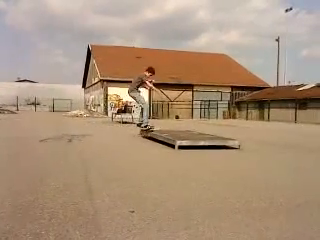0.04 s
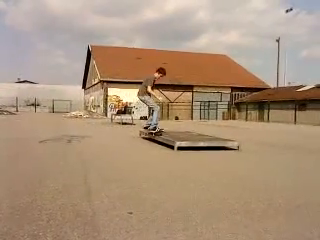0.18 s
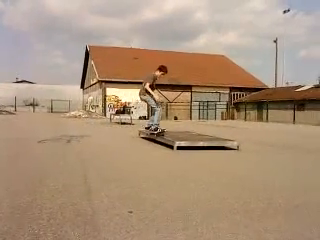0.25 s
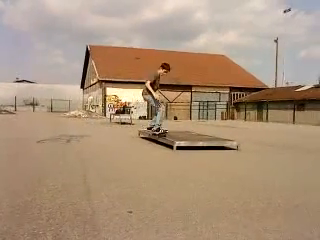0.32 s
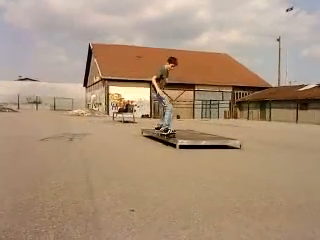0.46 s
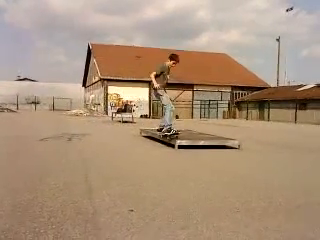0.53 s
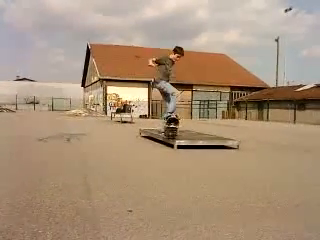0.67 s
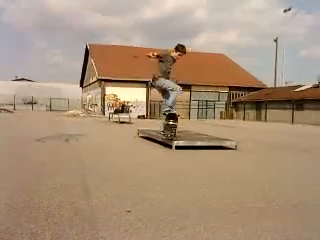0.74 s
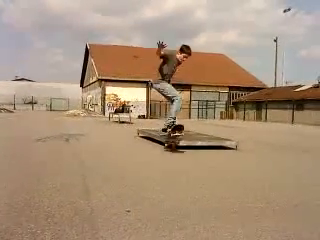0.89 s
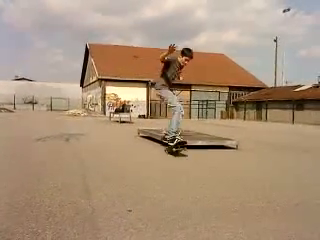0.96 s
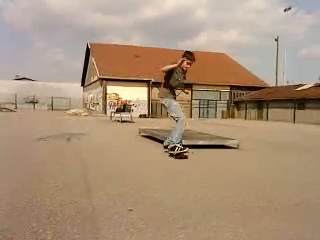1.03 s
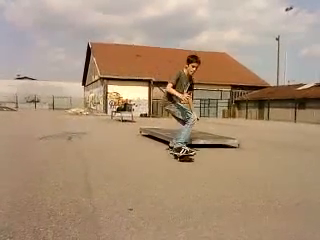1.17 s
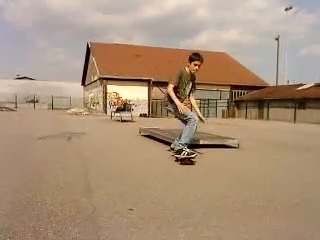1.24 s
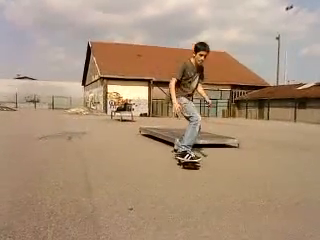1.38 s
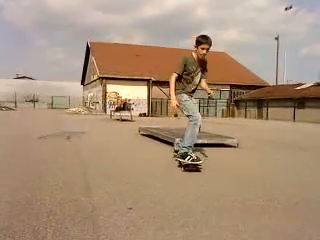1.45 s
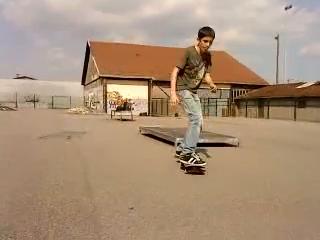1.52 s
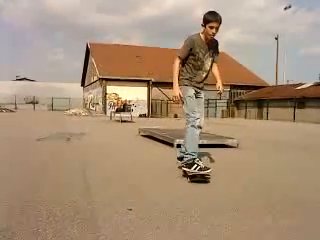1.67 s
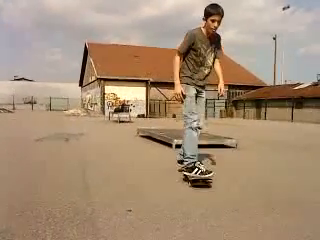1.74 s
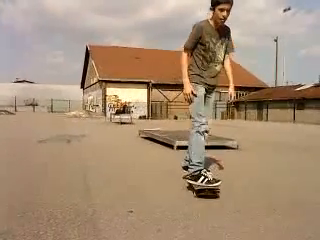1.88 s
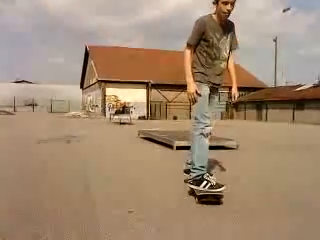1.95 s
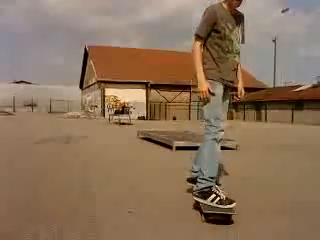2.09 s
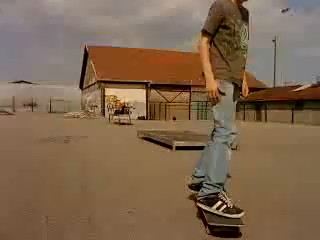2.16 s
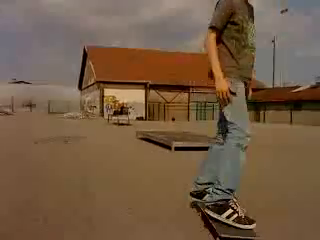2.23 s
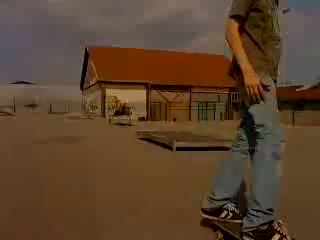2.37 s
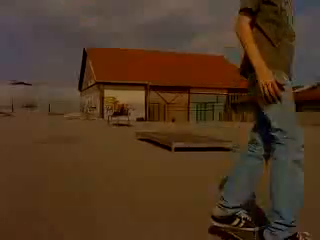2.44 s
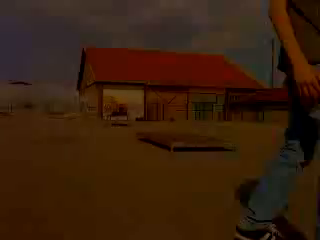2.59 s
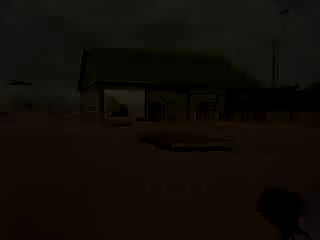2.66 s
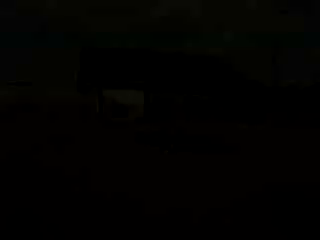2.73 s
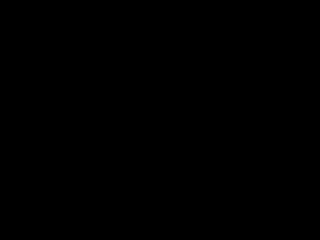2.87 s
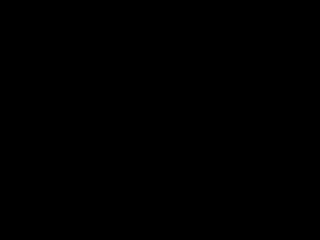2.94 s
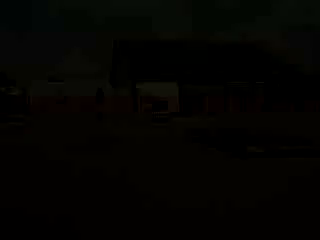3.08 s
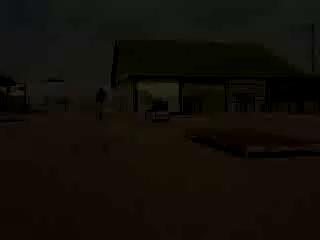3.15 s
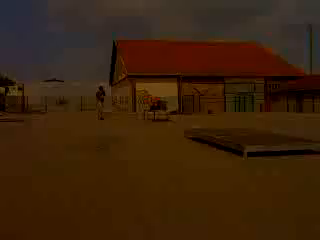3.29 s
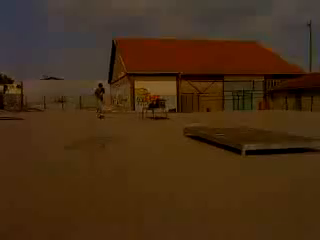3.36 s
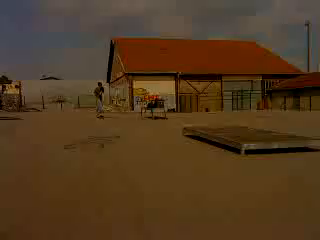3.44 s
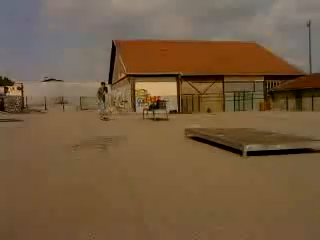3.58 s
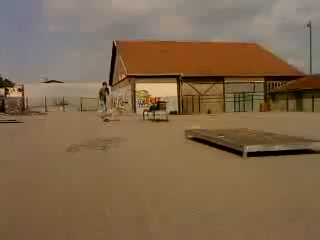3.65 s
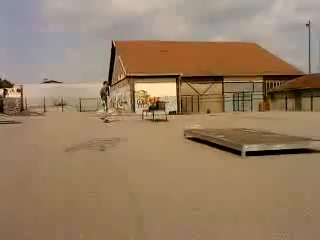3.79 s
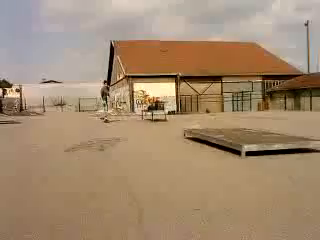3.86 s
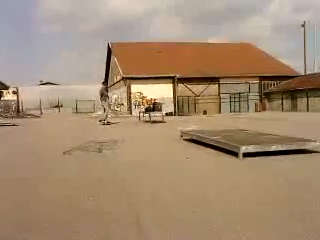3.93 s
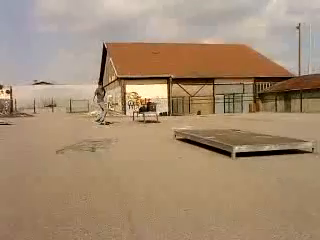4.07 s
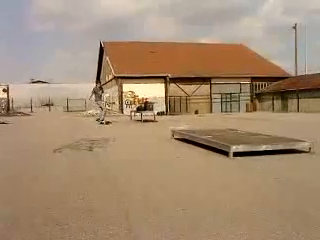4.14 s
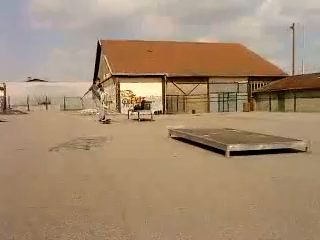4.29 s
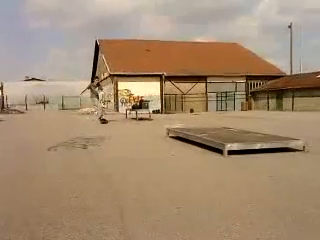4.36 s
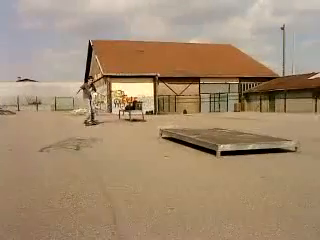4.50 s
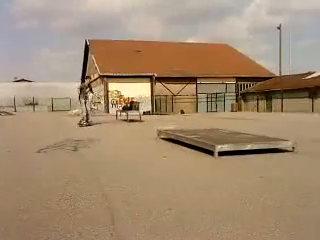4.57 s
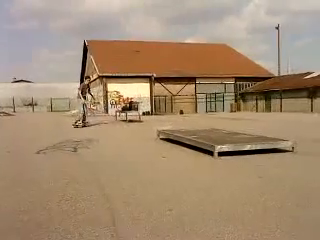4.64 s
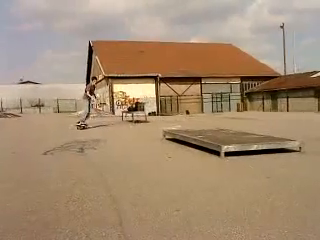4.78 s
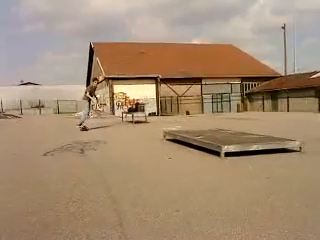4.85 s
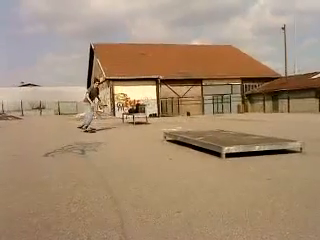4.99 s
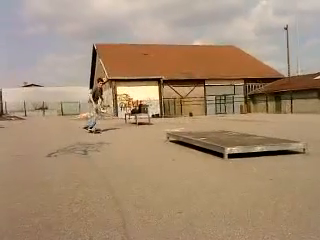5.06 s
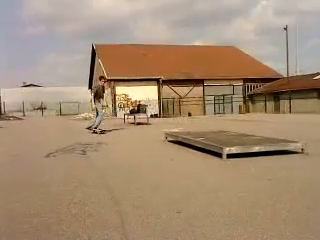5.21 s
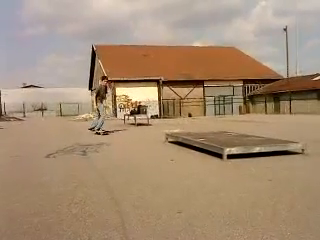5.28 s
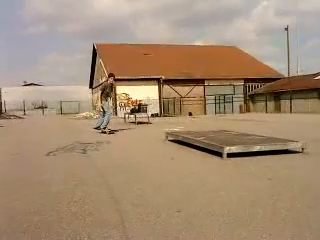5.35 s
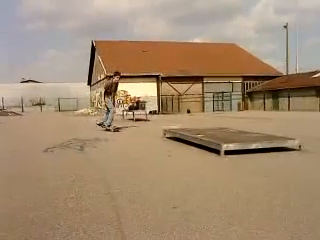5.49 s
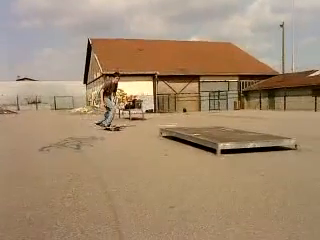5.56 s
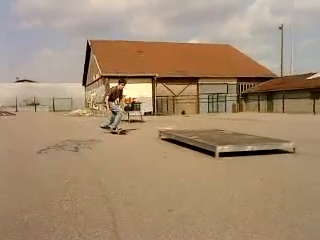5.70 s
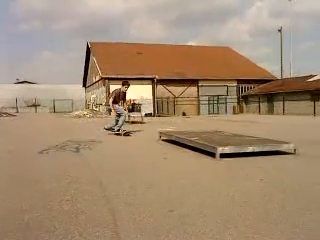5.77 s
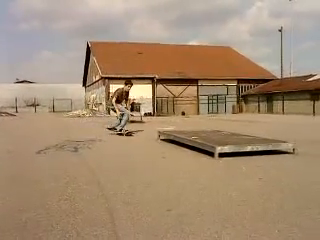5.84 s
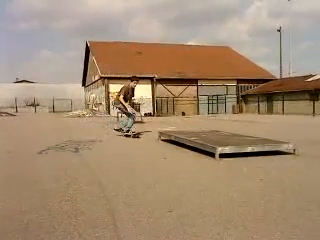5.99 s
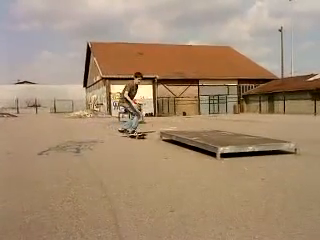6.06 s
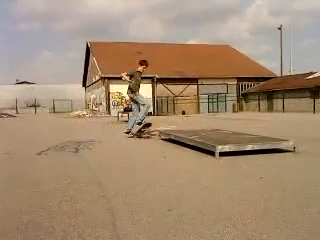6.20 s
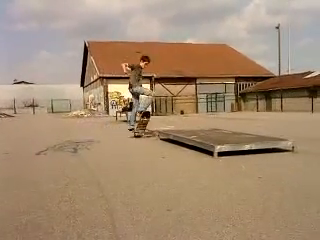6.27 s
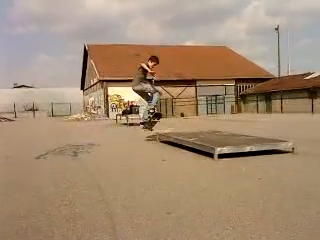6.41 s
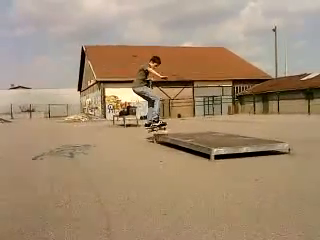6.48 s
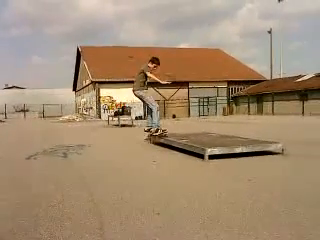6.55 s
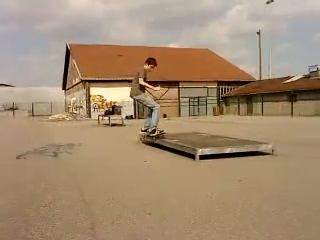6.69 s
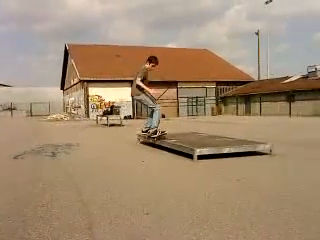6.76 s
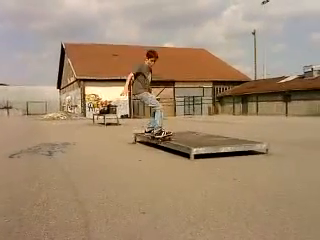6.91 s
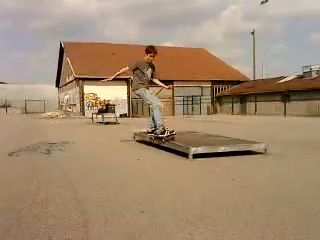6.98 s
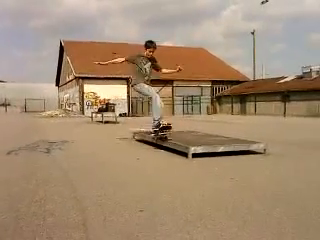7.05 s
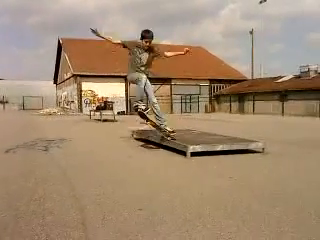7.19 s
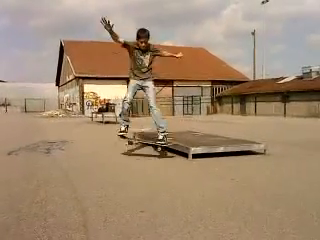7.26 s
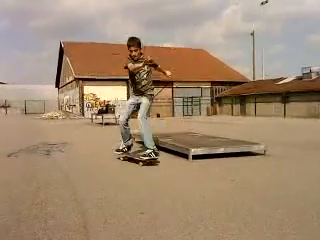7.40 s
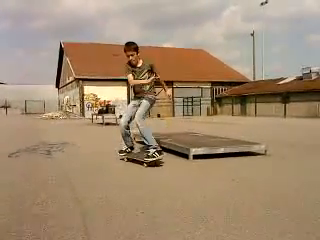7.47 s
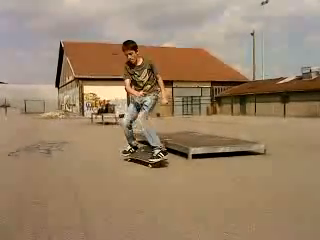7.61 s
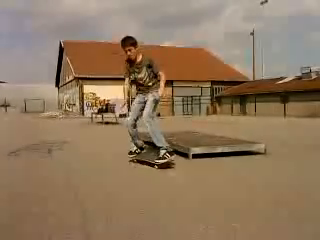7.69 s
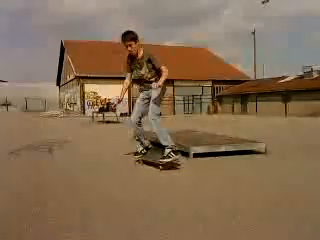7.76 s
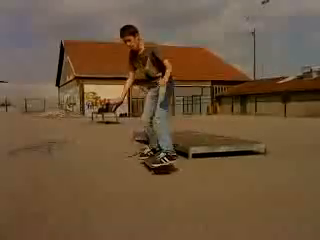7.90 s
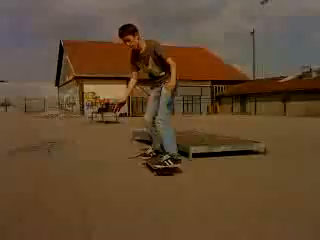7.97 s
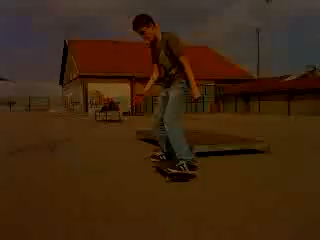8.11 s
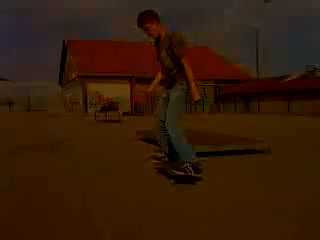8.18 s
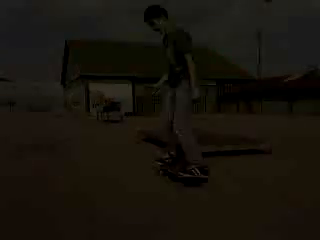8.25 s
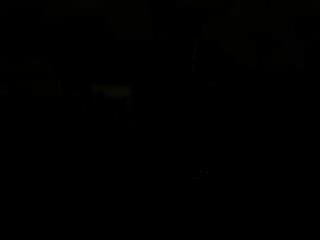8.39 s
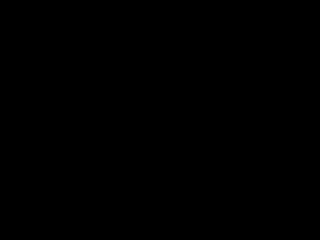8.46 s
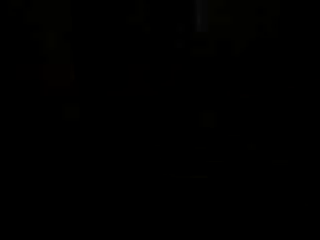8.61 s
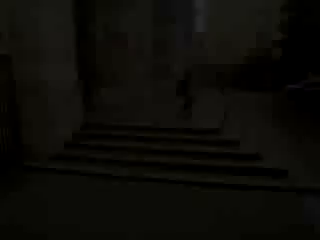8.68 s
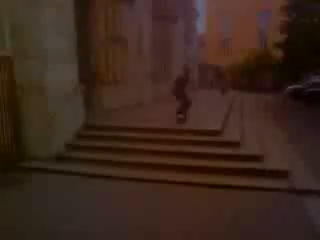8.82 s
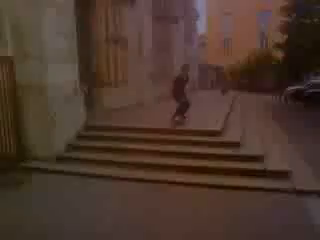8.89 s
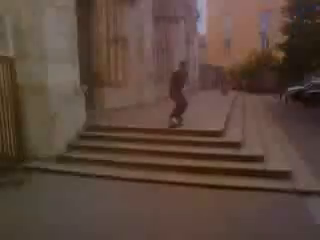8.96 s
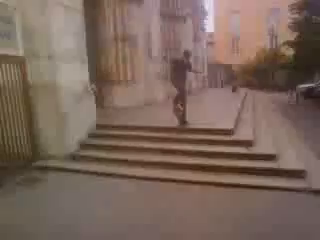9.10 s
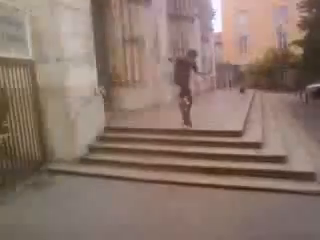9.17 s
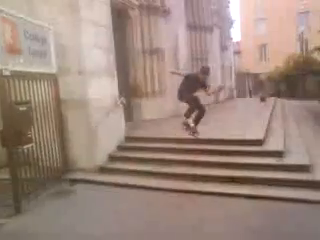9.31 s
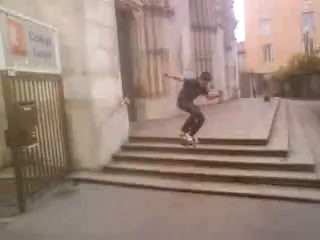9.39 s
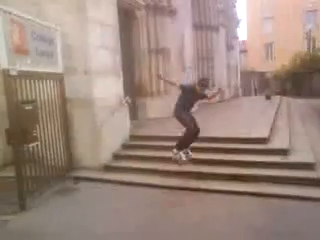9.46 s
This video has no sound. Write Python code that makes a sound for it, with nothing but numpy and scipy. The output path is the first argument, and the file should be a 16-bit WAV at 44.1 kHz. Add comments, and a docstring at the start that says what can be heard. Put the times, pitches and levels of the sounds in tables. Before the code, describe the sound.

Outdoors in an open yard, a skateboard's trucks knock onto a steel edge, grind with a ringing scrape, then the deck clacks sharply onto asphalt and the wheels roar past the small microphone. A faint distant engine rises. After a fade, wheels approach from afar, a second knock, shorter grind and landing follow. Another fade leads to wheels rolling on paving and one hard tail pop.

```python
"""A skateboarder rolls over rough asphalt, jumps onto a steel-edged box, grinds and lands, twice;
then another rolls over paving and pops the board at a flight of steps. Random grit impacts excite
resonances of wheels, deck and trucks, and decaying sine modes make the steel edge ring.
Low filtered noise is wind on the small microphone; at first the orders of a far engine gather speed.
There are three passages: each fades to near silence before the next fades in."""
import sys
import numpy as np
from scipy import signal
from scipy.fft import rfft, irfft, next_fast_len
from scipy.io import wavfile
from scipy.ndimage import uniform_filter1d

SR = 44100
rng = np.random.default_rng(int(sys.argv[2]) if len(sys.argv) > 2 else 0)


def digitize_waveform(pressure):
    """Quantize a signal to 16-bit integers and store it at the path in sys.argv[1].

    Rows of a 2-D input are taken as channels; values are limited to [-1, 1].
    """
    field = np.atleast_2d(pressure).T
    bounded = np.clip(field, -1, 1)
    quanta = np.round(bounded * 32767).astype(np.int16)
    wavfile.write(sys.argv[1], SR, quanta)


N = 420713
TIME = np.arange(N) / SR

# Wheels on the ground, relative levels along each run: time_s, roar_db, hiss_db
FIRST_RUN_CURVE = [(1.05, -45.5, -62), (1.77, -37, -51), (2.3, -33, -43.5), (2.45, -29, -36),
                   (2.56, -38, -45), (2.68, -46.5, -51), (3.1, -44.5, -57)]
# The same, for wheels coming from across the yard: time_s, roar_db, hiss_db
SECOND_RUN_CURVE = [(3.1, -54, -64), (3.45, -45.5, -61), (4.03, -33.5, -52.5), (4.28, -37, -49.5),
                    (4.42, -29.5, -49), (4.58, -32.5, -47.5), (4.88, -37.5, -52), (5.15, -35, -51.5),
                    (5.24, -37, -54.5), (5.75, -34, -49.5), (6.3, -33.5, -49.5), (6.72, -52.5, -66)]
# The same, as the board rolls away: time_s, roar_db, hiss_db
ROLL_AWAY_CURVE = [(7.45, -55, -72.5), (7.78, -42, -51.5), (7.9, -46, -56), (8.3, -56, -67.5),
                   (8.46, -47.5, -59.5), (8.6, -58, -70.5), (8.73, -51, -68)]
# The same, over paving: time_s, roar_db, hiss_db
PAVING_RUN_CURVE = [(8.73, -49, -59), (9.24, -29.5, -43), (9.54, -53, -54)]
# Resonances of deck and wheels: centre_hz, nominal width_hz, lift_db
BOARD_RESONANCES = [(576, 83, 2), (875, 110, 6.5), (1410, 260, 6.5), (1720, 170, 5), (5630, 380, 5.5)]
# Spectrum of the asphalt right in front of the microphone: frequency_hz, relative level_db
CLOSE_ASPHALT_SPECTRUM = [(60, -2.5), (150, 14), (400, 0.5), (1000, -6.5), (2100, -12.5), (2900, -21),
                          (4100, -22.5), (6000, -28), (7500, -25), (8500, -44.5)]
# Spectrum of struck wood: frequency_hz, relative level_db
WOOD_SPECTRUM = [(50, -18.5), (160, 9), (400, 3), (1000, 2), (2100, -1), (2900, -12), (5200, -8.5),
                 (7200, -14.5), (8500, -29)]
# Spectrum of low wind and ground rumble: frequency_hz, relative level_db
GUST_SPECTRUM = [(12, -22), (25, -9), (48, -2.5), (100, -5), (150, -11.5), (250, -28), (600, -59)]
# The board lands on the steel edge: time_s, relative level_db, truck_gap_s, screech_hz, screech_lift_db
LANDINGS_ON_EDGE = [(.151, -5.5, .008, 6070, 9.5), (6.725, -5.5, .011, 5430, -0.5)]


def amp(db):
    """Amplitude ratio of a level: 20 dB for each factor of ten."""
    return 10 ** (np.asarray(db) / 20)


def evened(x):
    """Normalizes the mean power, so that rms is 1."""
    return x / np.sqrt(np.mean(x ** 2) + 1e-20)


def add(mix, s, sound):
    """Superposes a sound on the mix from s seconds on."""
    part = mix[max(round(s * SR), 0):][:len(sound)]
    part += sound[:len(part)]


def follow(rows, t):
    """Linear interpolation of each column of a curve at the times t."""
    s, *columns = np.transpose(rows)
    return [np.interp(t, s, c) for c in columns]


def during(rows):
    """The sample times spanned by a curve."""
    return TIME[(TIME >= rows[0][0]) & (TIME <= rows[-1][0])]


def wander(n, hz):
    """Low-passed Gaussian noise of rms about 1: a random fluctuation mostly slower than hz."""
    step = 32  # samples between computed points
    size = next_fast_len(n // step + SR // step)
    f = np.fft.rfftfreq(size, step / SR)
    spectrum = rfft(rng.standard_normal(size)) / (1 + (f / hz) ** 4)
    slow = evened(irfft(spectrum, size))
    return np.interp(np.arange(n) / step, np.arange(size), slow)


def coloured(x, spectrum, resonances=(), size=4096):
    """Minimum-phase filter: the log spectrum fixes the phase, so energy arrives early and causally."""
    f = abs(np.fft.fftfreq(size, 1 / SR))
    hz, db = np.transpose(spectrum)
    db = np.interp(np.log(f + 1), np.log(hz), db)
    for centre, width, lift in resonances:
        db = db + lift / (1 + (2 * (f - centre) / width) ** 2)
    minimum_phase = np.exp(np.conj(signal.hilbert(np.log(amp(db)))))
    response = np.fft.ifft(minimum_phase).real
    return signal.oaconvolve(x, response[:size // 2])[:len(x)]


def bands(x):
    """Crossover into low, middle and high bands, each of rms 1."""
    low_edge_hz, high_edge_hz = 390, 2750
    edges = [(low_edge_hz, "low"), ([low_edge_hz, high_edge_hz], "band"), (high_edge_hz, "high")]
    filters = [signal.butter(4, hz, kind, fs=SR, output="sos") for hz, kind in edges]
    return [evened(signal.sosfilt(sos, x)) for sos in filters]


def grit(n, per_s, spread_db):
    """Random impulse train of stone impacts: many small, a few large, of either sign."""
    size = amp(spread_db * np.minimum(rng.exponential(1, n), 5)) * rng.choice([-1, 1], n)
    return evened(size * (rng.random(n) < per_s / SR))


def resonate(x, hz, width):
    """Heterodyne resonator: shifts the moving centre hz to zero, smooths there and shifts back."""
    turn = np.exp(2j * np.pi * np.cumsum(hz) / SR)
    r = np.exp(-np.pi * width / SR)
    return 2 * (turn * signal.lfilter([1 - r], [1, -r], x / turn)).real


def swaying(x, resonances, sway_db, drift):
    """Time-varying resonance: a shifting load makes the modes swell in turn and slide in pitch."""
    for hz, width, lift_db in resonances:
        centre = hz * (1 + drift * wander(len(x), 11))
        ring = resonate(x, centre, width / amp(lift_db / 2))  # stronger modes are narrower
        swell_db = lift_db + sway_db * np.tanh(wander(len(x), 13.3))
        x = x + ring * (amp(swell_db) - 1)
    return x


def wind():
    """Turbulent pressure on the microphone: a lumpy, steady light breeze, with two brief low thumps."""
    # Brief low thumps of the same noise: peak_s, half_length_s, nominal level_db
    low_thumps = [(7.26, 0.11, -40), (8.11, 0.027, -33.5)]
    breeze_db, gustiness_db = -49.5, 2  # nominal level, rms fluctuation
    thumps = sum(amp(db) * np.exp(-((TIME - s) / half_s) ** 2) for s, half_s, db in low_thumps)
    noise = evened(coloured(rng.standard_normal(N), GUST_SPECTRUM))
    return noise * (amp(breeze_db) + thumps) * amp(gustiness_db * wander(N, 6.3))


def engine():
    """Harmonic orders of the firing rate: only the lowest carry this far, wavering in the wind."""
    # Far engine gathering speed: time_s, firing_rate_hz, relative level_db
    engine_curve = [(0, 118.5, -33), (.4, 119.4, -45.5), (.95, 129.1, -31), (1.25, 137.4, -40.5),
                    (2.05, 153.2, -25), (2.65, 158.3, -30)]
    hz, db = follow(engine_curve, TIME)
    turns = np.cumsum(hz * (1 + 0.0049 * wander(N, 19.2))) / SR
    orders = [(.5, -16), (1, -4.5), (2, -15.5)]  # multiple, relative level_db
    hum = sum(amp(level) * np.sin(2 * np.pi * k * turns) for k, level in orders)
    gone = np.clip((engine_curve[-1][0] - TIME) / 0.042, 0, 1)
    return evened(hum) * amp(db - 2 + 2.6 * wander(N, 7.8)) * gone


def yard(x, wet_db=-15, t60=0.31, wall_s=0.048, wall_db=-22):
    """Reflection and scattering over open ground: one wall echo and a thin, dull, decaying tail."""
    t = TIME[:SR]
    tail = grit(SR, per_s=2000, spread_db=4.5) * 10 ** (-3 * t / t60) * np.minimum(t / 0.0047, 1)
    tail = coloured(tail, [(100, -2.5), (700, -5), (2000, -7.5), (8000, -11.5)])
    tail *= amp(wet_db) / np.linalg.norm(tail)
    add(tail, wall_s, amp(wall_db) * np.ones(1))
    return x + signal.oaconvolve(x, tail)[:N]


def deck():
    """Bending resonance of a plate: the deck drums as grit shakes it."""
    shaking = grit(N, per_s=1300, spread_db=1.0)
    spectrum = [(60, -26), (130, -3.5), (220, -0.5), (330, -2.0), (450, -20.0), (900, -59.5)]
    return evened(coloured(shaking, spectrum, [(221, 74, 4.2)]))


def under(rows, drum, ground, drum_db, rumble_db):
    """Common excitation: deck drumming and ground rumble rise and fall with the wheel roar."""
    span = (TIME >= rows[0][0]) & (TIME <= rows[-1][0])
    t = TIME[span]
    low = amp(drum_db) * drum[span] + amp(rumble_db) * ground[span]
    return t[0], low * amp(follow(rows, t)[0]) * signal.windows.tukey(len(t), .01)


def rumbling():
    """Low-frequency vibration under each run; loading the deck makes its drumming swell."""
    # The rider bears down (pushing, crouching, rolling close by): start_s, length_s, nominal level_db
    deck_loads = [(1.846, 0.44, -30.5), (3.99, 0.043, -18), (4.647, 0.097, -27), (5.281, 0.32, -27),
                  (9.292, 0.03, -29)]
    attack_s, release_s = 0.025, 0.032
    out, drum = np.zeros(N), deck()
    lumps = amp(3.3 * wander(N, 30))
    ground = evened(lumps * coloured(rng.standard_normal(N), GUST_SPECTRUM))
    add(out, *under(FIRST_RUN_CURVE, drum, ground, drum_db=0.5, rumble_db=-3.0))
    add(out, *under(SECOND_RUN_CURVE, drum, ground, drum_db=-4.0, rumble_db=-0.5))
    add(out, *under(ROLL_AWAY_CURVE, drum, ground, drum_db=-3.0, rumble_db=-5))
    add(out, *under(PAVING_RUN_CURVE, drum, ground, drum_db=-4, rumble_db=-2.0))
    t, load = TIME[:SR * 2], np.zeros(N)
    for s, length_s, db in deck_loads:
        swell = np.minimum(t / attack_s, 1) * np.exp(-np.maximum(t - length_s, 0) / release_s)
        add(load, s, amp(db) * swell)
    return out + load * drum * evened(amp(5.5 * wander(N, 8)))


def howling():
    """Frequency-modulated sine: a wheel rings at one wavering, sinking pitch."""
    # A wheel howls as it speeds over a ribbed slab: time_s, pitch_hz, relative level_db
    howl_curve = [(9.13, 718, -54), (9.215, 596, -28.5), (9.27, 577, -26.5), (9.32, 560, -46)]
    t = during(howl_curve)
    hz, db = follow(howl_curve, t)
    turns = np.cumsum(hz * (1 + 0.014 * wander(len(t), 80))) / SR
    out = np.zeros(N)
    add(out, t[0], amp(db + 1.7 * wander(len(t), 60)) * evened(np.sin(2 * np.pi * turns)))
    return out


def steel(x):
    """Modal ringing of the steel edge driven by x; the board riding on it blurs each mode."""
    # Modes of the edge: pitch_hz, relative level_db, t60_s
    steel_modes = [(827, -10.5, 0.38), (1320, -6, 0.3), (1453, 6.5, 0.35), (1810, -1.5, 0.22),
                   (1924, -6.5, 0.32), (2505, 1.5, 0.046)]
    t = TIME[:SR * 3 // 4]
    ring = 0
    for hz, db, t60 in steel_modes:
        drift = 6 * np.cumsum(wander(len(t), 40)) / SR  # in cycles, from 6 Hz rms
        ring = ring + amp(db) * 10 ** (-3 * t / t60) * np.sin(2 * np.pi * (hz * t + drift))
    return evened(signal.oaconvolve(x, ring)[:len(x)])


def grinding():
    """Stick-slip friction: trucks catch and slip, the edge sings, a weaker landing screech carries on."""
    # Trucks sliding along the edge: time_s, relative level_db
    first_grind_curve = [(0, -39.5), (.15, -45), (.3, -33.5), (.5, -38.5), (.58, -31), (.68, -31),
                         (.78, -31), (.93, -38.5), (1.1, -47)]
    # The same, for the second slide: time_s, relative level_db
    second_grind_curve = [(6.7, -41.5), (7.041, -38.5), (7.08, -35), (7.17, -38), (7.25, -33), (7.35, -42),
                          (7.5, -51.5)]
    # Resonances of the scraping trucks: centre_hz, nominal width_hz, lift_db
    scrape_resonances = [(860, 73, 3), (1280, 400, 5.5), (1530, 380, 4.5), (1820, 400, 1.5)]
    spectrum = [(300, -5), (650, -8), (2100, -9.5), (3000, -21.0), (6200, -22.5), (8500, -41.5)]
    out = np.zeros(N)
    runs = (first_grind_curve, second_grind_curve)
    for run, (*_, screech_hz, screech_db) in zip(runs, LANDINGS_ON_EDGE):
        t = during(run)
        slips = grit(len(t), per_s=3600, spread_db=1.0) * amp(0.8 * wander(len(t), 35))
        scrape = coloured(slips, spectrum, [(screech_hz, 900, screech_db / 2)])
        scrape = evened(swaying(scrape, scrape_resonances, sway_db=3.5, drift=0.046))
        slide = scrape + amp(-10) * steel(slips)
        level = amp(follow(run, t)[0] - 0.04)
        add(out, t[0], slide * level * signal.windows.tukey(len(t), .03))
    return out


def blow(rattle_s, snap, after_db, after_s, rise_s=0.0025):
    """Impulse excitation: one sharp contact, the chatter of loose parts, and a weak lingering buzz."""
    t = TIME[:SR * 3 // 4]
    dying = np.exp(-t / max(rattle_s, 1e-3)) + amp(after_db) * np.exp(-t / after_s)
    chatter = grit(len(t), per_s=4000, spread_db=2.0) * dying * (1 - np.exp(-t / rise_s))
    return chatter / np.linalg.norm(chatter) + snap * (t == 0)


def weighed(sound, db, thud_db, crack_db):
    """Spectral balance of a hit: low thud and high crack against the middle band."""
    thud, knock, crack = bands(sound)
    return amp(db) * (amp(thud_db) * thud + knock + amp(crack_db) * crack)


def clacking():
    """Damped plate modes: the wooden deck clacks short and dry when struck."""
    # Tail pops, landings, rattles: time_s, relative level_db, thud_db and crack_db against the
    # middle band, snap_db (sharp contact against chatter)
    board_clacks = [(0.754, -20, -17, -24, 5), (.794, -12.5, -14, -28, -12), (.873, -16, -2.5, -32, 1),
                    (1.122, -5, -9.5, -15.5, -6), (1.127, -11, -19, -19, 7), (1.1463, -9, -19, -9, 1),
                    (1.154, -4, -10.5, -11, 4), (1.199, -16, -11, -8.5, -18), (1.354, -24, 2, -26, 3),
                    (2.367, -13, -16, -18, -7), (2.469, -10.5, -1, -10, 3), (2.512, -14.5, 4, -14.5, 1),
                    (3.02, -34, 14, 0, -3), (5.063, -20, -22, -16, 8), (5.385, -13.5, 6, -13, 2),
                    (6.2712, -12, 12, -33, -5.5), (6.2876, -20, 17, -23, -1), (6.43, -4.5, -12, -17, 2.5),
                    (7.212, -20, 0, -17, -7), (7.224, -15, -7, -20, 0), (7.555, -3.5, -18.5, -12.5, 1.5),
                    (7.5598, -6.5, -10.5, -14, -8), (7.573, -21, -23, 4.5, -14),
                    (7.6002, -12.5, -9.5, -1.5, -7), (7.738, -16.5, -24, -5, -9),
                    (8.131, -23, -3, -6.5, -6), (8.196, -29.5, 1, -18, -1), (9.209, -16.5, 0.5, -13, -5),
                    (9.522, -23.5, -20, -34, -12)]
    # Resonances of the struck deck: centre_hz, width_hz, lift_db
    struck_resonances = [(843, 130, 7.5), (1433, 410, 6.5), (1716, 190, 5.5), (3770, 200, 4.5),
                         (5300, 190, 2.5), (7200, 440, 9.5)]
    out = np.zeros(N)
    for s, *levels, snap_db in board_clacks:
        strike = blow(rattle_s=0.0045, snap=amp(snap_db), after_db=-12.0, after_s=0.014)
        clack = coloured(strike, WOOD_SPECTRUM, struck_resonances)
        add(out, s, amp(-30.5) * weighed(clack, *levels))
    return out


def bumping():
    """Impact excitation of the board: cracks and coarse patches make the deck rumble."""
    # Wheels crossing them: time_s, relative level_db, thud_db and crack_db against the middle band, rattle_s
    ground_bumps = [(1.969, -4, -30, -7.5, 0.029), (2.096, -5, -23, -6.5, 0.031),
                    (3.988, -14, -9, -6, 0.092), (4.211, -15.5, -20, -9.5, 0.0097),
                    (4.437, -29, -11, -25, 0.018), (4.652, -10.5, 6, -5.5, 0.014),
                    (4.688, -12, 10.5, -4, 0.011), (5.293, -11.5, 3, -11.5, 0.06),
                    (5.386, -12.5, -16, -9.5, 0.072), (6.274, -11, -18, -26, 0.025),
                    (6.299, -7, -8, -25.5, 0.0075), (6.308, -5, -8, -21.5, 0.012),
                    (7.065, -19, -2.5, -12, 0.022), (8.639, -25.5, -20, -21.5, 0.055),
                    (9.305, -6.5, -6, -12, 0.033)]
    out = np.zeros(N)
    for s, *levels, rattle_s in ground_bumps:
        strike = blow(rattle_s, snap=0.21, after_db=-20, after_s=0.22, rise_s=0.0018)
        bump = coloured(strike, CLOSE_ASPHALT_SPECTRUM, BOARD_RESONANCES)
        add(out, s, amp(-29.0) * weighed(bump, *levels))
    return out


def landing_on_edge():
    """Successive impacts on a modal bar: a graze and then two trucks set the steel ringing."""
    # Contacts of each landing: delay in truck gaps, relative level_db, thud_db and crack_db against middle
    truck_hits = [(-.55, -11, -19, -10), (0, 1, -16.5, -11), (0.998, -9, -5, 3)]
    # Resonances of the slamming trucks: centre_hz, width_hz, lift_db
    slam_resonances = [(846, 120, 6.5), (1443, 400, 17.5), (1840, 240, 4.5)]
    out = np.zeros(N)
    for s, db, gap_s, screech_hz, screech_db in LANDINGS_ON_EDGE:
        for delay, *levels in truck_hits:
            strike = blow(rattle_s=0.0057, snap=0.56, after_db=-11.5, after_s=0.067, rise_s=0.0021)
            knock = coloured(strike, WOOD_SPECTRUM, [*slam_resonances, (screech_hz, 800, screech_db)])
            slam = weighed(evened(knock) + amp(-9.5) * steel(strike), *levels)
            add(out, s + delay * gap_s, amp(db - 25.5) * slam)
    return out


def popping():
    """Hard impact on stone: the tail cracks sharply and rebounds, ringing its resonances."""
    # The tail on stone paving and its rebounds: time_s, relative level_db
    tail_pops = [(9.382, 1), (9.394, -15), (9.424, -16)]
    # Resonances of the tail crack: centre_hz, width_hz, lift_db
    pop_resonances = [(1400, 180, 16), (2060, 660, 13), (2730, 240, 15.5)]
    spectrum = [(100, -15), (500, -6.5), (2600, -5.5), (3300, -3), (7000, -19)]
    out = np.zeros(N)
    for s, db in tail_pops:
        strike = blow(rattle_s=0.0026, snap=0.13, after_db=-13.0, after_s=0.019)
        add(out, s, amp(db - 32.5) * evened(coloured(strike, spectrum, pop_resonances)))
    return out


def thudding():
    """Low resonance of a hollow body: box or deck booms as the rider's weight comes down."""
    # Weight coming down: time_s, relative level_db, decay_s
    weight_thuds = [(0.799, -17.5, 0.053), (0.891, -19.5, 0.11), (2.554, -15.5, 0.0075),
                    (2.6, -19.5, 0.015), (4.795, -17.5, 0.011), (5.431, -14.5, 0.087), (7.21, -26, 0.18)]
    spectrum = [(40, -27.5), (110, 1.0), (220, -1.5), (400, -7.5), (900, -50.5)]
    out = np.zeros(N)
    for s, db, dying_s in weight_thuds:
        strike = blow(dying_s, snap=0.098, after_db=-21.5, after_s=0.34)
        add(out, s, amp(db - 19.0) * evened(coloured(strike, spectrum, [(123.5, 36, 8.9)])))
    return out


def ride(rows, ground, resonances, bearings_db, flutter_db, level_db, ticks_db):
    """Roughness excitation: grit shakes the rolling board; jolts modulate roar and hiss together."""
    t = during(rows)
    roar_db, hiss_db = follow(rows, t)
    stones = grit(len(t), per_s=4000, spread_db=0.4)
    # coarser stones tick under the wheels
    ticks = grit(len(t), per_s=90, spread_db=3.5)
    contact = coloured(stones + amp(ticks_db) * ticks, ground)
    _, roar, hiss = bands(swaying(contact, resonances, sway_db=3.5, drift=0.039))
    brief = t[t < t[0] + .06] - t[0]
    # bearings and axles ring with many close, short modes
    bearings = rng.standard_normal(len(brief)) * np.exp(-brief / .008)
    ringing = signal.oaconvolve(hiss, bearings)[:len(t)]
    # the ringing wavers slightly and irregularly in pitch
    wavering = np.interp(t + 0.000599 * wander(len(t), 3.05), t, ringing)
    hiss = hiss + amp(bearings_db) * evened(wavering)
    hiss = evened(hiss * amp(2.3 * wander(len(t), 23)))
    # each jolt over a pebble rattles the board for a moment
    pebbles = rng.random(len(t)) * (rng.random(len(t)) < 20 / SR)
    jolts = signal.oaconvolve(pebbles, np.exp(-brief / 0.01))[:len(t)]
    shake = evened(amp(flutter_db * wander(len(t), 35)) * (1 + .7 * jolts))
    wheels = amp(roar_db) * roar + amp(hiss_db) * hiss
    return t[0], wheels * shake * amp(level_db) * signal.windows.tukey(len(t), .01)


def rolling():
    """Rolling-contact noise: hard wheels run over asphalt, near and far, and then over paving."""
    # Spectrum of asphalt: frequency_hz, relative level_db
    asphalt_spectrum = [(150, 14), (400, -2.5), (1000, -11), (1900, -14), (2700, -20), (4200, -19),
                        (6000, -23.5), (7400, -19.5), (8500, -39)]
    # Spectrum of paving: frequency_hz, relative level_db
    paving_spectrum = [(200, -5), (450, 1.5), (620, -0.5), (1000, -1), (1600, -0.5), (2700, -10.5),
                       (4500, -13.5), (7000, -27.5)]
    # Resonances of wheels heard from across the yard: centre_hz, nominal width_hz, lift_db
    far_resonances = [(620, 136, 6), (887, 94, 2.5), (1500, 380, 9.5), (2120, 200, 1)]
    # Resonances of wheels on paving: centre_hz, nominal width_hz, lift_db
    paving_resonances = [(762, 170, 9)]
    out = np.zeros(N)
    add(out, *ride(FIRST_RUN_CURVE, CLOSE_ASPHALT_SPECTRUM, BOARD_RESONANCES,
                   bearings_db=1, flutter_db=1.53, level_db=3.0, ticks_db=-9.5))
    add(out, *ride(SECOND_RUN_CURVE, asphalt_spectrum, far_resonances,
                   bearings_db=3.0, flutter_db=0.77, level_db=1.5, ticks_db=-8))
    add(out, *ride(ROLL_AWAY_CURVE, asphalt_spectrum, BOARD_RESONANCES,
                   bearings_db=0, flutter_db=1.8, level_db=4.0, ticks_db=-11))
    add(out, *ride(PAVING_RUN_CURVE, paving_spectrum, paving_resonances,
                   bearings_db=2, flutter_db=2.0, level_db=4.0, ticks_db=-11))
    return out


def fades():
    """Amplitude envelope: each passage fades to near silence, the next fades in with one brief dip."""
    # Joins between passages: time_s, dip_db, dip_length_s
    passage_joins = [(3.095, -16, 0.068), (8.732, -8, 0.03)]
    fade_out_s, fade_in_s, fade_power = 0.38, 0.7, 0.36
    silent_s, dip_after_s = 0.013, 0.077  # near silence on each side of a join, delay of the dip
    gain = np.ones(N)
    for s, dip_db, dip_s in passage_joins:
        t = TIME - s
        ramp = np.maximum((-t - silent_s) / fade_out_s, (t - silent_s) / fade_in_s)
        dip = (t > dip_after_s) & (t < dip_after_s + dip_s)
        gain *= np.clip(ramp, 1e-6, 1) ** fade_power * amp(dip_db * dip)
    return uniform_filter1d(gain, size=200)


def scene():
    """Superposition: the board sounds in the yard, engine and wind directly, all under the fades."""
    hits = clacking() + bumping() + landing_on_edge() + popping() + thudding()
    board = rolling() + howling() + rumbling() + grinding() + hits
    sound = yard(board) + engine() + wind()
    return (sound * fades())[None]


def record(dry):
    """Saturation and low-pass: the small microphone rounds hard hits; the last passage is duller."""
    cut_hz, last_cut_hz, last_start_s = 8850, 7200, 8.83
    ceiling = 1.0
    sound = ceiling * np.tanh(dry / ceiling)

    def low_pass(hz):
        """Linear-phase windowed-sinc filter."""
        taps = signal.firwin(255, hz, window=("kaiser", 9), fs=SR)
        return signal.oaconvolve(sound, taps[None], "same")

    return np.where(TIME < last_start_s, low_pass(cut_hz), low_pass(last_cut_hz))


dry = scene()
out = record(dry)
digitize_waveform(out)
```